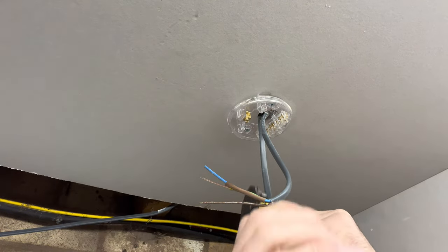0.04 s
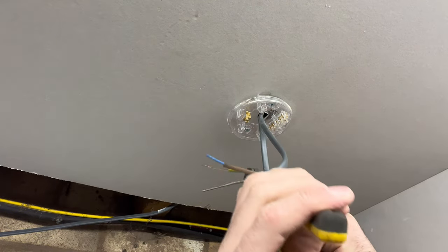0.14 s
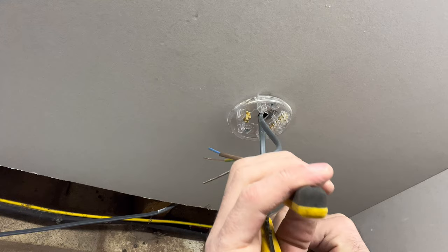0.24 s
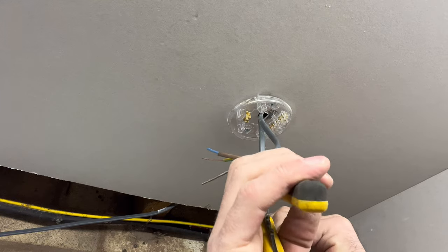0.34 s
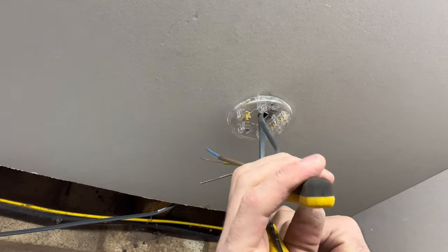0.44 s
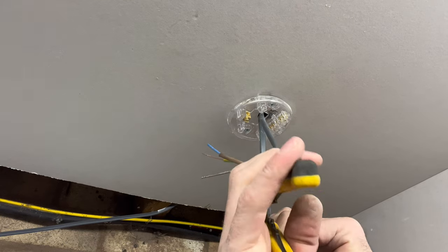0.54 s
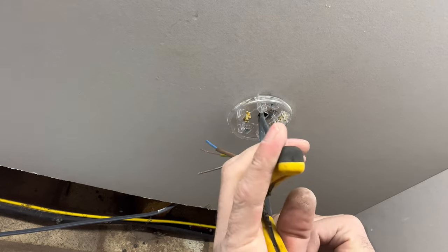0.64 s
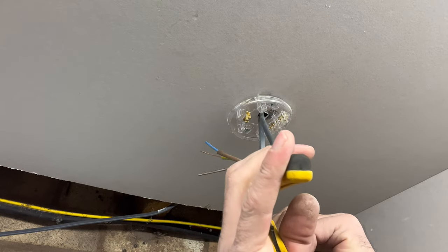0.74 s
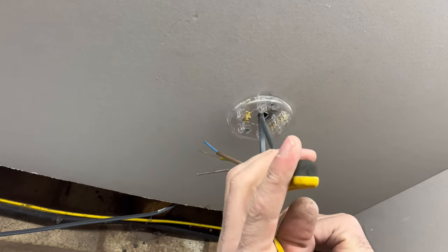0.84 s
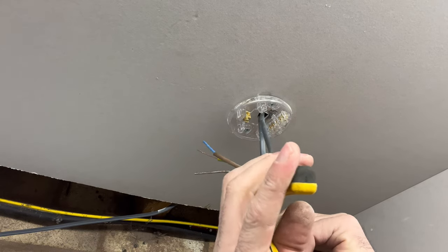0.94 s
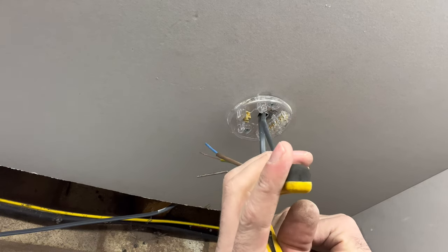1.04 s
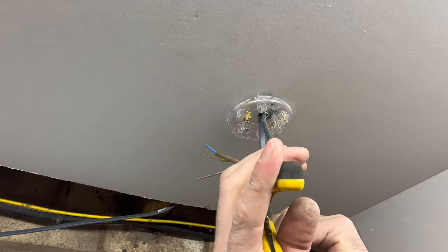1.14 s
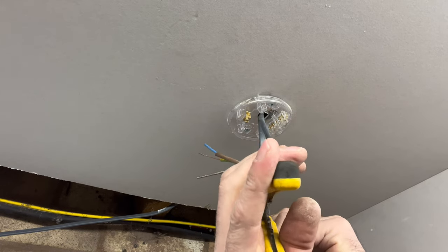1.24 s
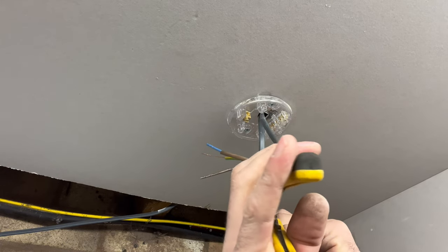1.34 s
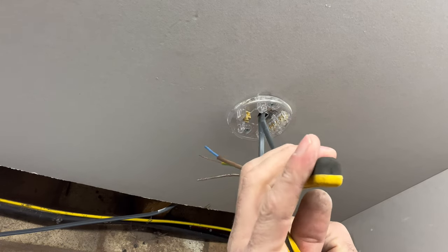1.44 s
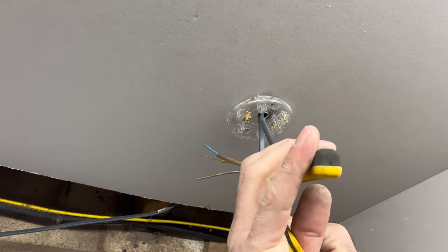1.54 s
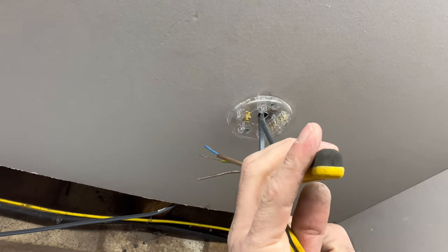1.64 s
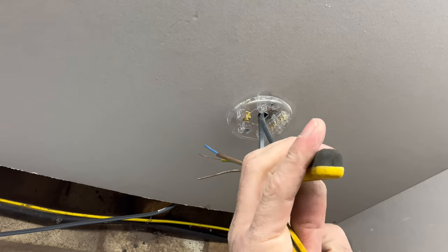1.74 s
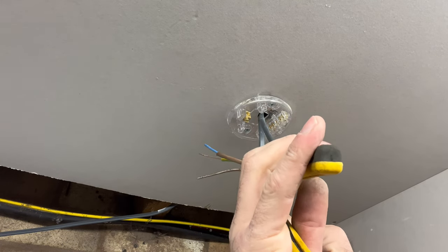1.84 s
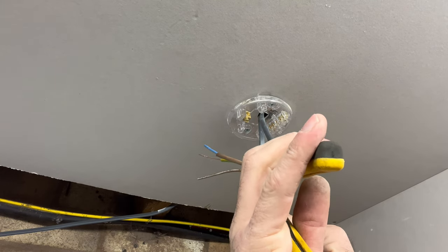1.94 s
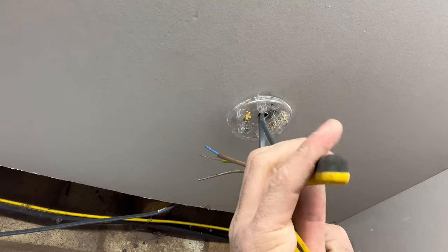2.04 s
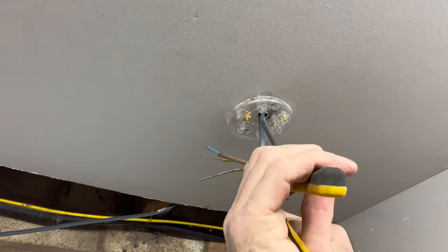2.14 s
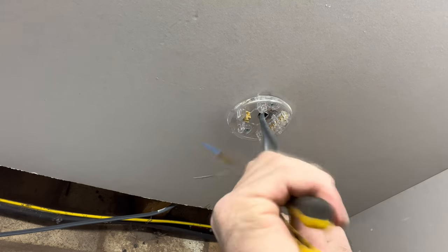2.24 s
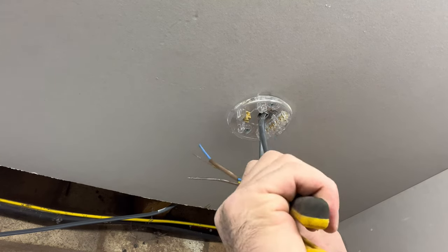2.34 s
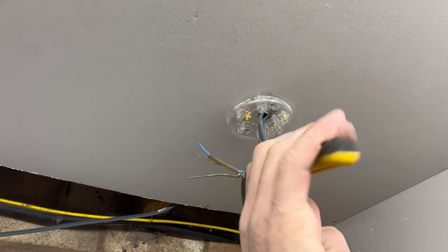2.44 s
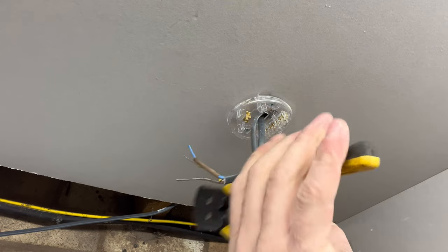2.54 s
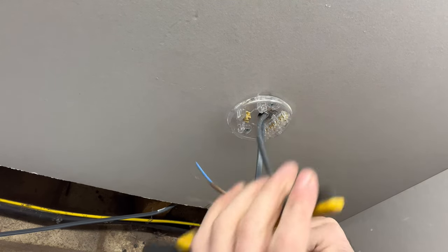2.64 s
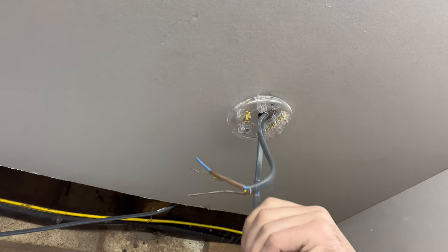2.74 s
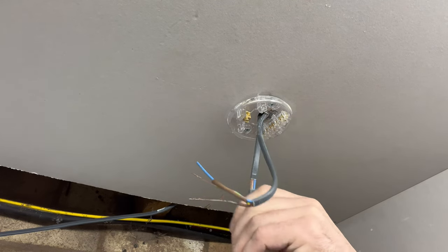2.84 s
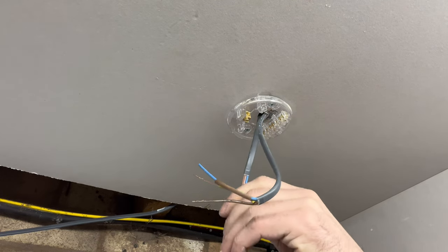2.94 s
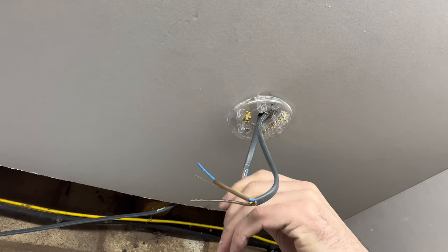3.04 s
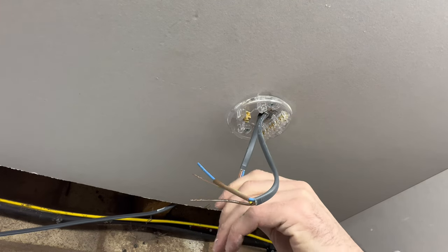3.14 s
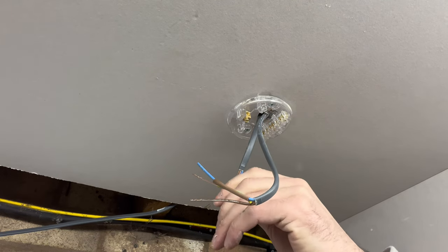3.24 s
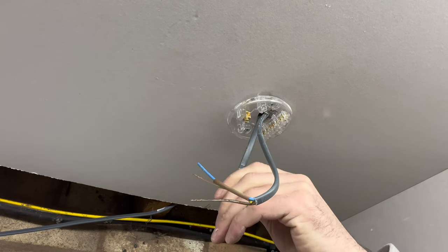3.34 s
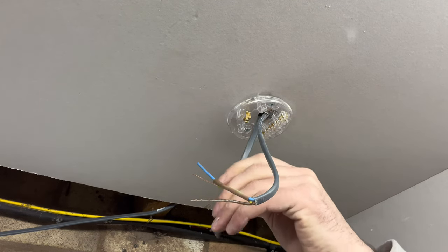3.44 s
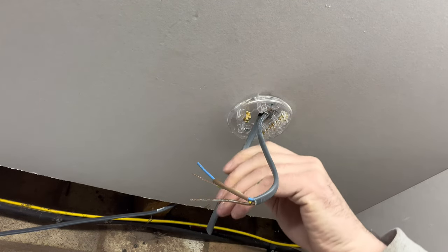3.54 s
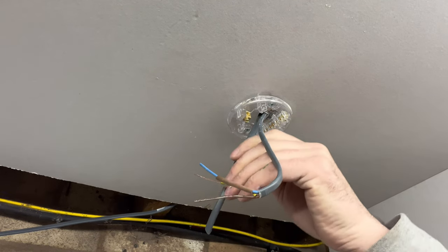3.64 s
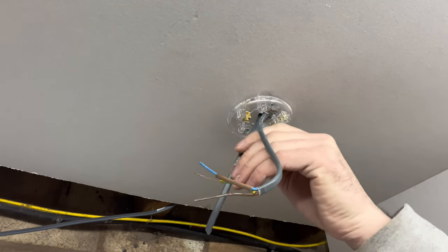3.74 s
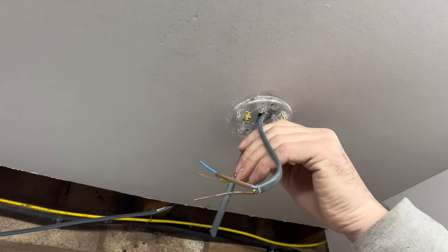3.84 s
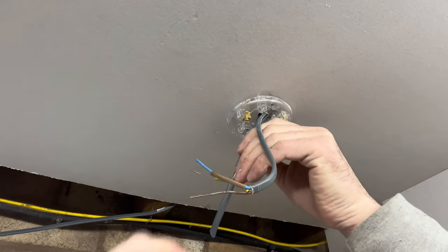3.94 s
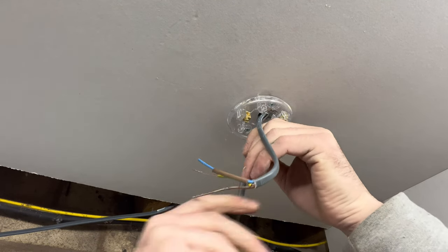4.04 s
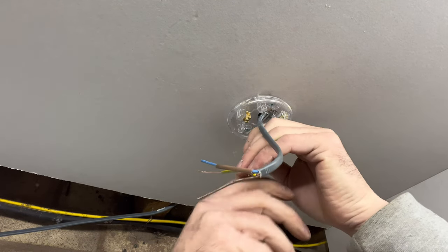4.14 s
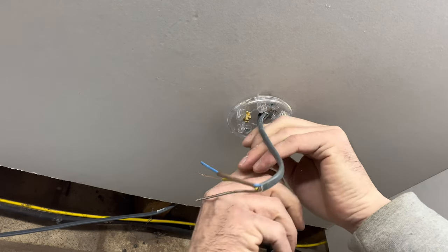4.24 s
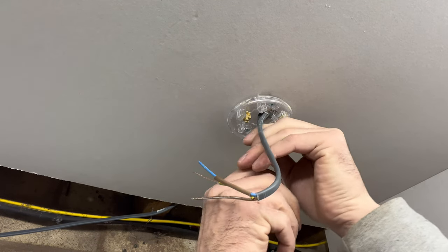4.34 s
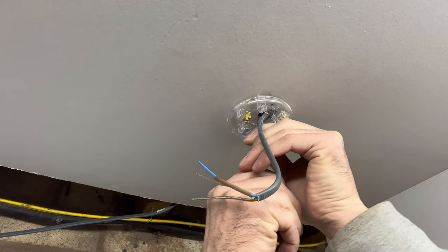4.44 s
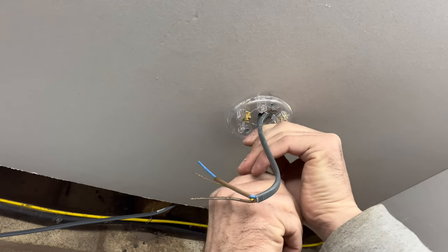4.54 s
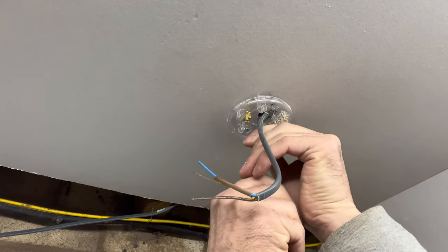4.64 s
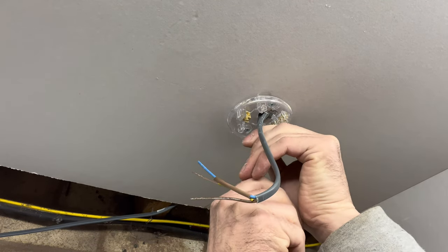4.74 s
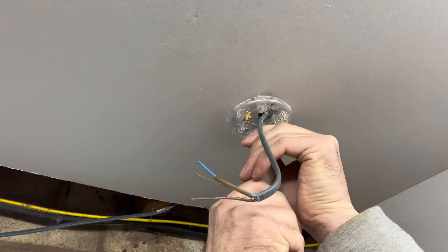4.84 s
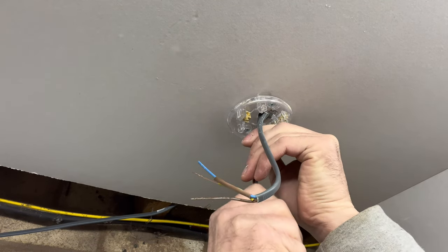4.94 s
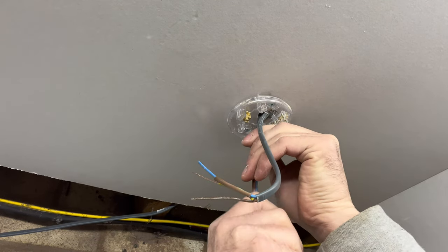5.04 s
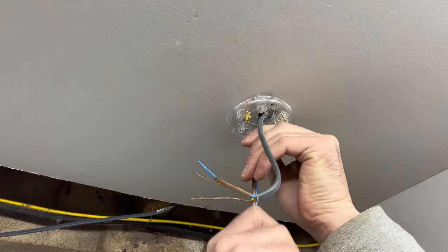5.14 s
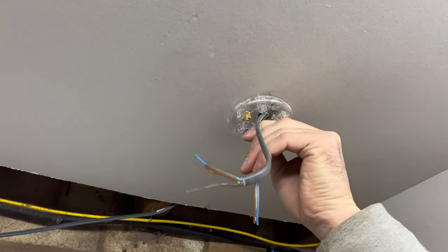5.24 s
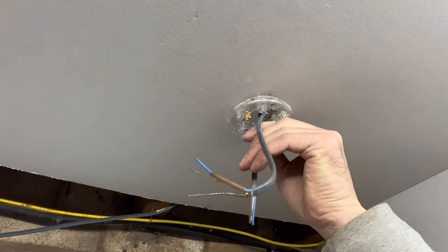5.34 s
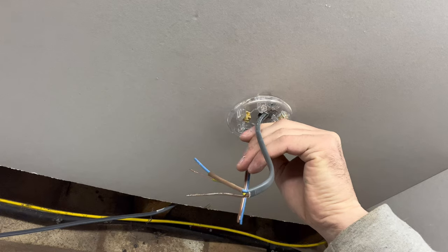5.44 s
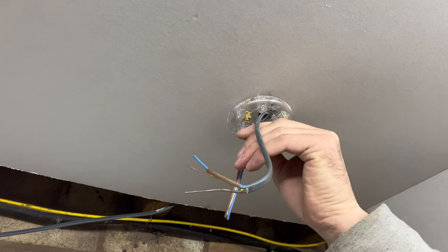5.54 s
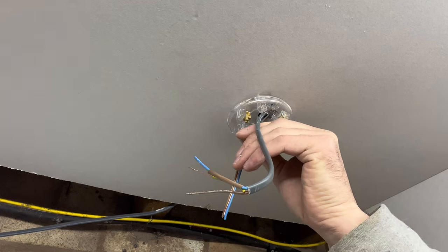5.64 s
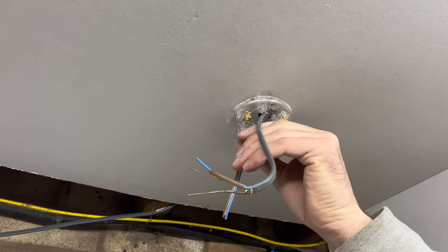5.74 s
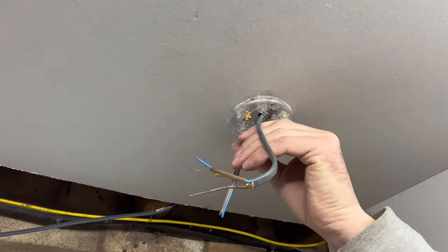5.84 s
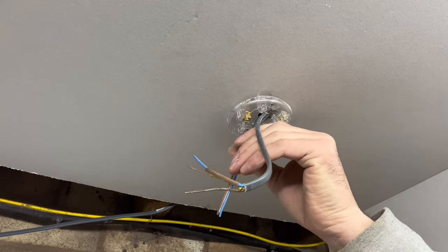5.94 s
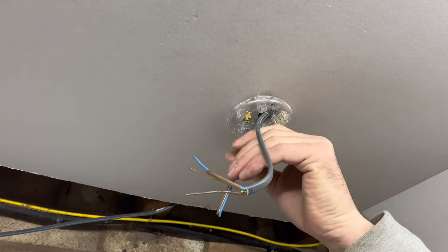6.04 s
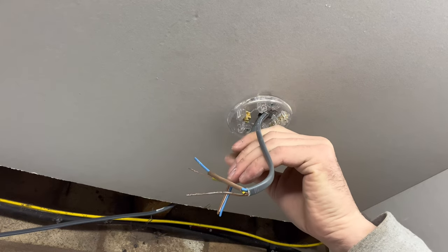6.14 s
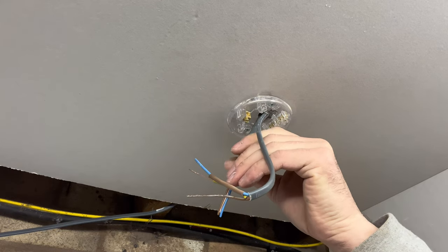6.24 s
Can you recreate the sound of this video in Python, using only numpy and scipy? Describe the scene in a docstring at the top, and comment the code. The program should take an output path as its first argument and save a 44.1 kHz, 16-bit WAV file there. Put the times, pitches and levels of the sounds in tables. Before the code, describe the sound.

A quiet low building rumble runs throughout a bare room, with hands working close to a phone microphone. From 0 to 0.6 s a tool gives small gritty ticks and soft knocks with short dry rustles of sleeve and cable sheath. Around 1.0 to 1.2 s come fainter knocks, then barely audible rubbing until 2.1 s. At 2.25 s the jaws bite with a loud, bright metallic snap, and a second crisp cluster with a scrape follows at 2.4 s; a smaller click lands at 2.65 s. Soft rustling continues to about 3.4 s. At 3.5 to 3.8 s hollow board thuds tumble together with a sharp click, and something slides briefly to rest. Then gentle rubbing and a faint tick, dull knocks at 5.2 s, light rustles, and a few low thuds from 5.95 s, mostly at 6.1 to 6.3 s.

```python
"""A hand stripper works on a cable hanging from a ceiling, an arm's length from a phone, over a low rumble.
Light ticks and knocks come first, then faint rustling; at about 2.2 s the jaws bite and snap brightly.
At 3.5 s a hollow board thuds and something slides to rest; rustles, ticks and dull thuds follow to the end.
Gritty contact rings the tool, blows ring the board's modes, and sleeves and sheath rub as shaped noise.
Decaying noise answers ticks and thuds as a bare room."""
import sys
import numpy as np
from scipy import signal
from scipy.fft import rfft, irfft, next_fast_len
from scipy.io import wavfile
from scipy.ndimage import uniform_filter1d

SR = 44100
rng = np.random.default_rng(int(sys.argv[2]) if len(sys.argv) > 2 else 0)


def materialize(psi):
    """Save the field psi as 16-bit PCM at rate SR to the path in sys.argv[1].

    A 1-D psi becomes a single channel; in a 2-D psi each row is a channel.
    """
    bounded = np.clip(np.atleast_2d(psi).T, -1, 1)
    quanta = np.round(bounded * 32767).astype(np.int16)
    wavfile.write(sys.argv[1], SR, quanta)


N = 277389


def undb(db):
    """Decibels express an amplitude ratio on a logarithmic scale; return the ratio."""
    return 10 ** (np.asarray(db) / 20)


def unit(x):
    """Normalise power: scale to rms 1."""
    return x / np.sqrt(np.mean(x ** 2))


def curve(s, v):
    """Linear interpolation through (s, v), one value a sample."""
    return np.interp(np.arange(N) / SR, s, v)


def colour(x, points):
    """Linear filtering: weight the spectrum by (hz, db) points, joined on a log frequency axis."""
    hz, db = np.transpose(points)
    size = next_fast_len(N)
    f = np.maximum(np.arange(size // 2 + 1) * SR / size, 1)
    gain = undb(np.interp(np.log(f), np.log(hz), db))
    return irfft(rfft(x, size) * gain, size)[..., :N]


def stereo(mid, side, like_hz):
    """Interaural coherence: with the side high-passed, both ears are alike well below like_hz."""
    side = signal.sosfilt(signal.butter(2, like_hz, "high", fs=SR, output="sos"), side)
    return np.array([mid + side, mid - side])


def noise(points, like_hz):
    """Random broadband sound: stereo Gaussian noise with a given spectrum, rms 1."""
    ends = [(points[0][0] / 2, -80)] + list(points) + [(points[-1][0] * 2, -60)]
    mid, side = colour(rng.standard_normal((2, N)), ends)
    return unit(stereo(mid, side, like_hz))


def walk(rate):
    """Random modulation: levels held 1 / rate s and smoothed twice; spread near 1."""
    k = int(SR / rate)
    held = np.repeat(rng.standard_normal(N // k + 1), k)
    return 2.0 * uniform_filter1d(uniform_filter1d(held, k), k)[:N]


def slow_pair(order, cutoff_hz):
    """Narrow-band noise begins as two independent low-passed noises in quadrature."""
    sos = signal.butter(order, cutoff_hz, fs=SR, output="sos")
    return signal.sosfilt(sos, rng.standard_normal((2, N)))


def shift_up(slow, turn):
    """Quadrature modulation: move a slow noise pair up to the carrier of phase turn (radians)."""
    return slow[0] * np.cos(turn) + slow[1] * np.sin(turn)


def rumble():
    """Ambient noise: the building's low random vibration, swelling a little."""
    # spectrum: hz, density_db (dB per Hz)
    spectrum = [(18, -32), (30, -6), (102, -7), (174, -16.5), (326, -23), (352, -25), (431, -25),
                (464, -26.5), (601, -25.5), (737, -31), (809, -27.5), (2500, -60), (3250, -95.5),
                (5500, -120)]
    swell_db = .8 * walk(3) + 1.5 * walk(12)
    return undb(-49.5 + swell_db) * noise(spectrum, 190)


def room(x, t60, dark_hz, rise_ms, like_hz):
    """Diffuse reverberation: noise that fades in over rise_ms, then decays 60 dB in t60 seconds."""
    echo_s, echo_spread_s, echo_db = .016, 0.0013, 3.5  # the nearest wall's answer stands out
    t = np.arange(int(.7 * SR)) / SR
    decay = 1000 ** (-t / t60)
    rise = np.clip(t / (rise_ms / 1000), 0, 1) ** 2
    echo = undb(echo_db * np.exp(-((t - echo_s) / echo_spread_s) ** 2))
    mid, side = rng.standard_normal((2, len(t))) * decay * rise * echo
    darken = signal.butter(1, dark_hz, fs=SR, output="sos")
    tail = signal.sosfilt(darken, stereo(mid, side, like_hz))
    tail = tail / np.sqrt(np.sum(tail ** 2) / 2)  # mean energy 1 per ear
    return signal.fftconvolve(x[None], tail, axes=1)[:, :N]


def slide():
    """Sliding friction: a narrow hiss wavers in one gliding resonance as something slides to rest."""
    # path of the slide: time_s, level_db, resonance_hz
    path = [(3.666, -46, 1392), (3.705, -53, 1433), (3.717, -50, 1575), (3.775, -58, 1465),
            (3.86, -51, 1430), (3.93, -57.5, 1400), (4.04, -64.5, 1300)]
    s, db, hz = np.transpose(path)
    slow = slow_pair(3, 145)
    turn = 2 * np.pi * np.cumsum(curve(s, hz)) / SR
    band = unit(shift_up(slow, turn))
    gate = curve([s[0] - .003, s[0], s[-1], s[-1] + 0.068], [0, 1, 1, 0])
    return gate * undb(curve(s, db) + 1.5 * walk(35)) * band


def strokes():
    """Rubbing: each stroke swells, holds and fades; powers of cloth and sheath add, notes superpose."""
    # strokes of sleeves and fingers on the sheath: full_s (time of full pressure), swell_s, hold_s,
    # fade (dB per s), cloth_db, sheath_db, note_db, note_hz, glide (Hz per s)
    gestures = [(0.0, .02, 0.017, 150, -65.5, -65, -55.5, 4520, 4),
                (0.062, 0.037, 0.056, 84, -57.5, -57.5, -63, 4500, 889),
                (0.395, 0.038, 0.2, 290, -61.5, -59.5, -73, 747, 4),
                (0.822, .04, 0.2, 59.5, -84, -81.5, -83, 3000, 0),
                (1.279, 0.086, 0.016, 105, -73, -72, -82, 2210, 3),
                (1.447, 0.41, 0.054, 66, -72.5, -97, -76.5, 3623, 3),
                (2.078, 0.057, 0.0062, 251, -57, -53.5, -65.5, 4100, 5.5),
                (2.247, 0.046, 0.04, 119.5, -50.5, -60, -73, 4800, -2),
                (2.394, 0.0041, 0.051, 166.5, -45, -39, -56, 3410, 7),
                (2.703, 0.068, 0.038, 83, -61, -71, -65, 4667, -4000),
                (2.798, 0.42, 0.28, 120, -65.5, -62.5, -67, 2367, -700),
                (2.777, 0.062, 0.27, 121.5, -83, -78, -64.5, 1099, 303),
                (3.035, 0.18, 0.13, 158.5, -60, -60, -67, 4380, 2599.5),
                (3.592, 0.072, 0.1, 215, -48, -50.5, -60.5, 3700, -0.5),
                (3.797, 0.043, 0.062, 6, -64.5, -66, -79.5, 3270, 11),
                (4.208, 0.023, 0.039, 57, -62, -58.5, -61.5, 4635, -400),
                (4.506, 0.054, 0.13, 31.5, -63, -64.5, -73.5, 5500, 10.5),
                (4.943, 0.2, 0.26, 46.5, -68.5, -65.5, -73, 7100, -10),
                (5.399, 0.13, 0.12, 198, -61.5, -60, -67, 2100, 5),
                (5.757, 0.062, 0.14, 43, -62, -73.5, -71.5, 3100, 1),
                (6.125, 0.029, 0.024, 196, -55.5, -55, -64.5, 3250, 1),
                (6.145, 0.011, 0.011, 504, -70, -70, -62, 3900, -30000),
                (6.205, 0.12, 0.046, 100, -60.5, -72, -77, 4380, 6)]
    swell_range_db, shortest_swell_s = 17.5, .005
    still_db = [[-80], [-82.5]]  # cloth and sheath hiss faintly while the hands rest
    note_width_hz = 240
    t = np.arange(N) / SR
    power, notes = undb(still_db) ** 2 * np.ones(N), np.zeros(N)
    slow = unit(slow_pair(2, note_width_hz / 2))
    waver = np.cumsum(.01 * walk(15)) / SR  # the notes wander by a percent or two
    for s, swell, hold, fade, cloth_db, sheath_db, note_db, hz, glide in gestures:
        rise_db = swell_range_db * np.maximum(s - t, 0) / max(swell, shortest_swell_s)
        fall_db = fade * np.maximum(t - s - hold, 0)
        shape_db = -rise_db - fall_db
        on = shape_db > -45
        shape, since = undb(shape_db[on]), t[on] - s
        power[:, on] += (undb([[cloth_db], [sheath_db]]) * shape) ** 2
        turn = 2 * np.pi * ((hz + glide * since / 2) * since + hz * waver[on])
        notes[on] += undb(note_db) * shape * shift_up(slow[:, on], turn)
    cloth_gain, sheath_gain = np.sqrt(power)
    return cloth_gain, sheath_gain, notes


def patchy(x):
    """Small resonances come and go: narrow bands of the hiss swell and fade on their own."""
    spec = signal.stft(x, nperseg=512)[2]
    db = rng.standard_normal(spec.shape[1:])
    db = uniform_filter1d(db, size=2, axis=0)   # over frequency
    db = uniform_filter1d(db, size=12, axis=1)  # over time
    streaked = spec * undb(3.2 * unit(db))
    return unit(signal.istft(streaked, nperseg=512)[1][:, :N])


def grain(slow_db, fast_db=1.1):
    """Rough contact modulates the rubbing level at a slow and a fast rate."""
    return undb(slow_db * walk(30) + fast_db * walk(400))


def rustle():
    """Stick and slip: cloth and sheath rub as grainy hiss, fibres crackle, scraping notes come and go."""
    # hiss of cloth: hz, density_db (dB per Hz)
    cloth_hiss = [(700, -1), (1100, -5), (1600, -6), (2200, -3.5), (2600, -5), (3300, -5.5), (3900, -5),
                  (4650, -4), (5800, -14)]
    # hiss of sheath: hz, density_db (dB per Hz)
    sheath_hiss = [(5000, 1), (7000, 0.5), (9500, 2.5), (13500, -1.5), (15500, -10.5)]
    crackle_per_s, crackle_db = 500, -12  # fibres and sheath catch and let go
    cloth_gain, sheath_gain, notes = strokes()
    catch = (rng.random(N) < crackle_per_s / SR) * rng.standard_normal(N)
    crackle_spectrum = [(300, -47.0)] + list(cloth_hiss) + [(12000, -24.5)]
    crackle = undb(crackle_db) * unit(colour(catch, crackle_spectrum))
    cloth = cloth_gain * (grain(.4) * patchy(noise(cloth_hiss, 3000)) + crackle)
    sheath = grain(.5) * sheath_gain * patchy(noise(sheath_hiss, 17000))
    return cloth + sheath + grain(1.5) * notes


def thuds():
    """Modal vibration: soft blows swing the hollow board's modes up from rest, the deep ones last."""
    # dull knocks: start_s, level_db (of modes from 170 to 320 Hz), and relative to that level
    # low_db (modes below 170 Hz), upper_db (320 to 500 Hz), top_db (above 500 Hz)
    knocks = [(0.063, -60, -37, 6, 24), (0.083, -42, -19, 1, 7), (0.394, -48.5, -5, -5, 11),
              (0.415, -49.5, 4, 5, 11), (0.485, -41.5, -24, -2, 10), (0.618, -47.5, -10.5, 0, 12),
              (1.008, -47.5, -1, 8.5, 14), (1.147, -44.5, -27, -0.5, 11.5), (1.234, -54.5, -6, 12.5, 26.5),
              (2.249, -37, 9.5, 2.5, 12.5), (2.258, -22, -3.5, -3.5, -5.5), (2.287, -36.5, -14.5, 2.5, 8),
              (2.323, -40.5, 9.5, -5.5, 2.5), (2.411, -62, 3, 12.5, 15.5), (2.423, -52.5, -0.5, 15, 6),
              (2.66, -40, -2, -1, 8), (2.989, -49, 12.5, 5, 8), (3.514, -15, -10, -13.5, -7.5),
              (3.534, -35, 11.5, 5.5, 10), (3.581, -16.5, -11.5, -5, -9.5), (3.592, -27, -10, 13.5, 8.5),
              (3.611, -33, -7, 1, 8), (3.636, -29, -10, -4, -15), (3.692, -19, -8.5, -11, -6),
              (3.735, -34, 3.5, -4.5, -15), (3.772, -28.5, -5, -25, -8.5), (3.812, -38, 0.5, -12.5, -30),
              (4.044, -38.5, -14, -2, -2), (5.194, -34.5, -4, -3, -6), (5.204, -38, -8, 7, 7.5),
              (5.221, -44, 8.5, 5, -1), (5.242, -56.5, 9.5, -7.5, 7), (5.959, -44.5, 0, 1, 0),
              (6.132, -31.5, -29, -14.5, -8), (6.211, -28.5, -9, -18, -23), (6.228, -29.5, -19.5, -4, -1),
              (6.257, -29, -2, -14, -4)]
    # modes of the hollow board: mode_hz, mode_db, t60_s
    board_modes = [(67.5, 0, 0.15), (95.4, 5.5, .15), (162, -10.5, .08), (222.6, 0.5, 0.048),
                   (229, -1, 0.07), (306.6, -7, 0.077), (354.7, -0.5, 0.06), (437, -5.5, 0.072),
                   (569, -6, 0.035), (700.4, -1, 0.026), (900, -7.5, 0.026)]
    rise_cycles = 1.8  # time constant of a mode's swing up
    out, t = np.zeros(N + SR), np.arange(SR // 2) / SR
    for s, level_db, low_db, upper_db, top_db in knocks:
        at = slice(int(s * SR), int(s * SR) + len(t))
        for hz, db, t60 in board_modes:
            share_db = low_db if hz < 170 else 0 if hz < 320 else upper_db if hz < 500 else top_db
            tune = 1 + .02 * rng.standard_normal()  # each blow detunes the modes a little
            wave = np.sin(2 * np.pi * hz * tune * t) * 1000 ** (-t / t60)
            rise = 1 - np.exp(-t * hz / rise_cycles)
            out[at] += undb(level_db + share_db + db) * wave * rise
    return out[:N]


def ring(x, peaks):
    """Resonance: two-pole filters (hz, width_hz, db) summed with alternating sign."""
    out = 0
    for k, (hz, width, db) in enumerate(peaks):
        b, a = signal.iirpeak(hz, hz / width, SR)
        out = out + (-1) ** k * undb(db) * signal.lfilter(b, a, x)
    return out


def tool(push, shares_db, touched_hz, tune, samples):
    """Forced vibration: a push rings handles, jaws, blades and touched part, each at its rms share."""
    # resonances of the handles: hz, width_hz, level_db
    handle_modes = [(600, 970, 13), (900, 290, -14.5), (1400, 820, -13.5), (2100, 720, 15)]
    # resonances of the jaws: hz, width_hz, level_db
    jaw_modes = [(3000, 790, 4.9), (3900, 140, 11), (4800, 570, 5)]
    # resonances of the blades: hz, width_hz, level_db
    blade_modes = [(6240, 1000, -0.5), (7870, 3500, -1.5), (10470, 360, 6), (12840, 680, -4.5)]
    parts = [ring(push, np.array(modes) * [tune, 1, 1]) for modes in (handle_modes, jaw_modes, blade_modes)]
    parts.append(ring(push, [(touched_hz, touched_hz / 6, 0)]))
    out = 0
    for part, db in zip(parts, shares_db):
        rms = np.sqrt(np.sum(part ** 2) / samples)  # energy spread over the contact
        out = out + undb(db) * part / rms
    return out


def ticks():
    """Contact excitation: milliseconds of grit ring the tool; the far walls get one impulsive blow."""
    # ticks and snaps: start_s, level_db, handles_db and blades_db (relative to level_db), contact_ms,
    # touched_hz (pitch of the touched part)
    contacts = [(0.058, -53.5, -6, -8, 19, 900), (0.081, -47.5, -3.5, -8, 5.8, 1240),
                (0.391, -62, -7, -15, 3.1, 2750), (0.405, -62, 1, -10, 7.3, 2750),
                (0.485, -43.5, -2, 7, 8, 7700), (0.614, -60, 6, -14, 7.7, 2865),
                (1.003, -57, 11, -18, 4.3, 3900), (1.14, -55, 7.5, -14, 6.9, 1980),
                (1.2308, -55.5, 7.5, -13, 6.6, 3750), (1.409, -62, 3.5, 13.5, 6.4, 3880),
                (1.8734, -57.5, -21, -25, 4.1, 4100), (2.146, -61.5, 5, -10, 6.1, 3000),
                (2.1601, -50, 1, -19.5, 5, 1600), (2.1696, -45.5, -3.5, 1, 5.2, 4050),
                (2.2476, -16.5, -3.5, 5, 4.7, 8980), (2.253, -18, -17.5, 3, 3.1, 4170),
                (2.322, -41.5, -7, 6.5, 4.6, 7920), (2.391, -35.5, -12, 4.5, 6.2, 9100),
                (2.4116, -24, -7, 5.5, 3.2, 9900), (2.4202, -26.5, -13.5, 6, 5.4, 9300),
                (2.4476, -15, -34, 4, 6.8, 9130), (2.655, -32.5, -3.5, 5, 6.1, 8460),
                (3.5098, -47, 0.5, 0.5, 12.5, 2500), (3.571, -40.5, -9, -9, 9.9, 3780),
                (3.579, -21.5, -7, 12, 7.7, 10000), (3.666, -52, -11.5, 17, 1.24, 1400),
                (3.689, -49.5, -2, -5, 13, 3200), (4.042, -58, 0, -2, 5, 900),
                (4.269, -62, 3, -11.5, 7.3, 4340), (5.186, -48, -1, 0, 18, 3900),
                (5.249, -58.5, -25, 6.5, 4.4, 9000), (5.86, -51.5, 2, -4, 13, 2620),
                (5.98, -71, 19, -34, 11.7, 2640), (6.223, -60, 1, -17, 8.5, 3200),
                (6.257, -71, 8, -18, 6, 800)]
    near, far, t = np.zeros(N + 4096), np.zeros(N + 4096), np.arange(3072) / SR
    impulse = 1. * (t == 0)
    for s, level_db, handles_db, blades_db, ms, hz in contacts:
        hold = max(ms, 1) / 1000
        grit = rng.standard_normal(len(t)) * undb(2.5 * rng.standard_normal(len(t)))
        grit *= np.sin(np.pi * np.clip(t / hold, 0, 1) ** 4.7) ** 0.2  # pressure builds, then lets go
        at = slice(int(s * SR), int(s * SR) + len(t))
        tune = 1 + .05 * rng.standard_normal()  # the grip shifts the resonances
        touched_db = max(handles_db, 0, blades_db) - 0.5
        near_db = (handles_db, 0, blades_db, touched_db)
        far_db = (handles_db + 5.5, 0, blades_db, touched_db + 0.5)
        near[at] += undb(level_db) * tool(grit, near_db, hz, tune, hold * SR)
        far[at] += undb(level_db) * tool(impulse, far_db, hz, tune, hold * SR)
    return near[:N], far[:N]


def ports(x):
    """Interchannel phase and level: split each lag and level step evenly between left and right."""
    # two ports on the phone body, for sound from the hands: hz, lag_rad (left behind right),
    # step_db (left minus right)
    port_steps = [(1500, 0, 0), (2200, -1.4, -1), (3700, -1.1, 2), (4500, 2.2, 4), (5000, 3.5, 5),
                  (6800, 5, 5), (8000, 6.3, 0), (16000, 15.4, 0)]
    hz, lag, db = np.transpose(port_steps)
    size = next_fast_len(N)
    f = np.arange(size // 2 + 1) * SR / size
    left = undb(np.interp(f, hz, db) / 2) * np.exp(-.5j * np.interp(f, hz, lag))
    return irfft(rfft(x, size) * np.array([left, 1 / left]), size)[:, :N]


def lag_left(x):
    """Arrival-time difference: sound of the board and the building reaches the left port later."""
    lag_ms = 0.28
    at = np.arange(N)
    return np.array([np.interp(at - lag_ms * SR / 1000, at, x[0]), x[1]])


def scene():
    """Superposition: hands and tool near the phone, the board below, the room round them."""
    (snap, blow), knock = ticks(), thuds()
    knock = knock * undb(1.8 * walk(150))  # the board buzzes against its supports
    rattle_db = 1.5 * walk(200)  # the tick tails rattle unevenly
    tick_tails = undb(-8 + rattle_db) * room(blow, 0.17, 5800, 5, 600)
    thud_tails = undb(-9.5) * room(knock, 0.18, 1500, 3.0, 140)
    # left and right levels differ a little, in dB
    below = undb([[.6], [-.6]]) * knock + undb([[.9], [-.9]]) * rumble()
    return ports(snap + rustle()) + lag_left(below) + slide() + tick_tails + thud_tails


def record(dry):
    """Linear filtering and saturation: set the overall tone, round the loudest peaks and cut the top."""
    # overall tone, thin deep bass: hz, gain_db
    tone = [(22, -29.5), (48, 4.5), (9900, -2.5), (10500, -18.5), (11400, -14), (12200, -5.5), (15000, -3)]
    rounded = np.tanh(colour(dry, tone))
    top_cut = signal.ellip(8, .2, 70, 16550, fs=SR, output="sos")  # ripple dB, stop dB, edge Hz
    return signal.sosfilt(top_cut, rounded)


dry = scene()
out = record(dry)
materialize(out)
```